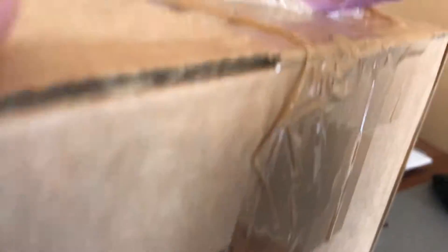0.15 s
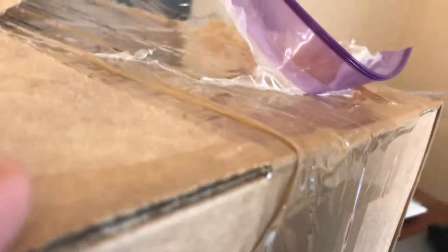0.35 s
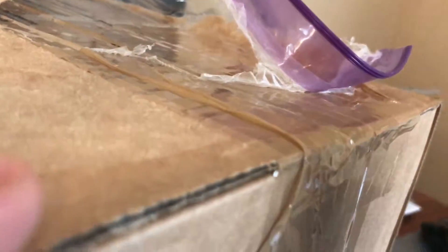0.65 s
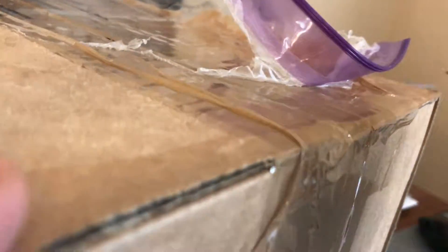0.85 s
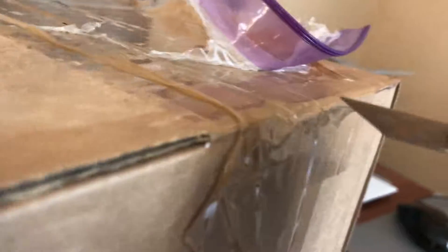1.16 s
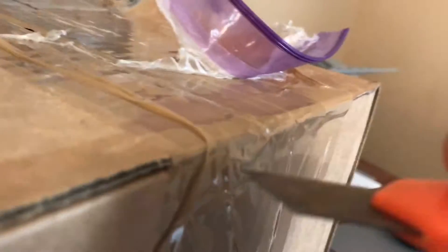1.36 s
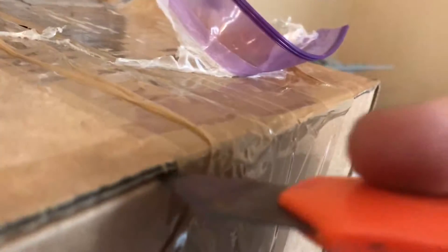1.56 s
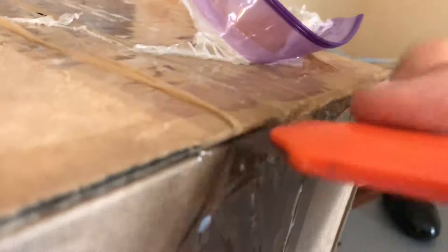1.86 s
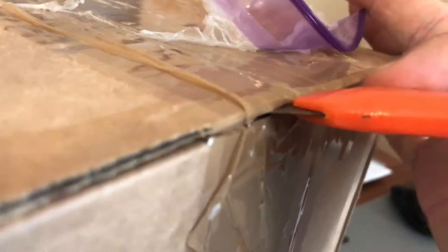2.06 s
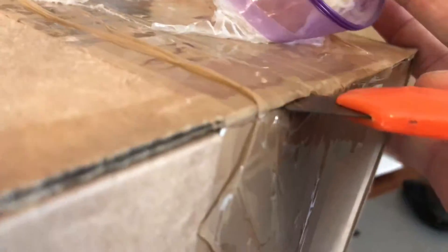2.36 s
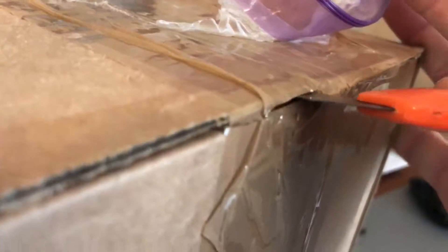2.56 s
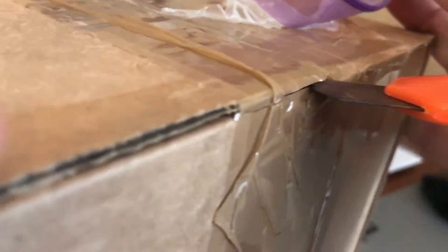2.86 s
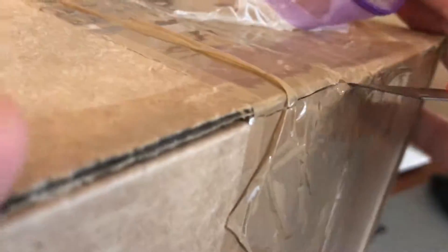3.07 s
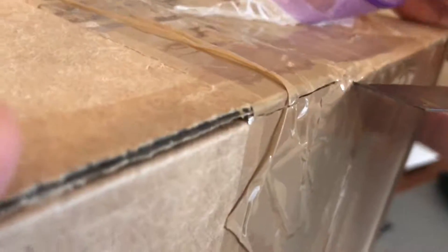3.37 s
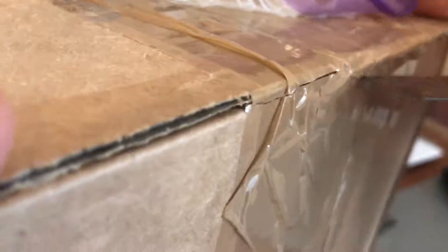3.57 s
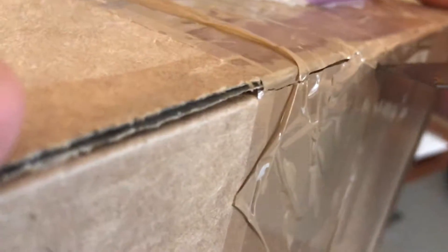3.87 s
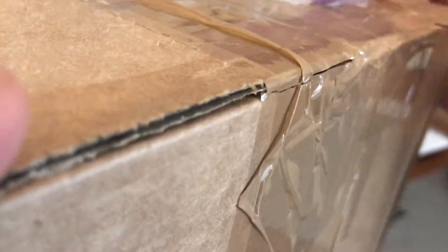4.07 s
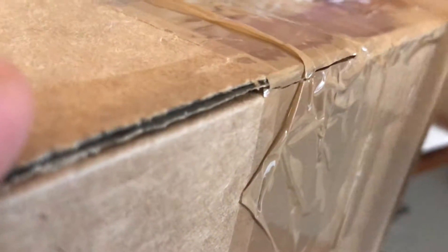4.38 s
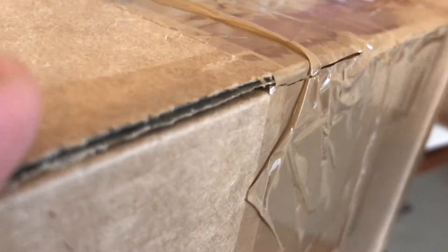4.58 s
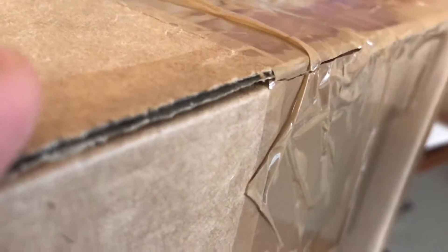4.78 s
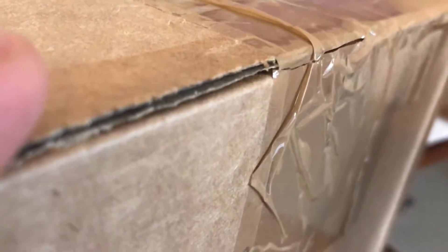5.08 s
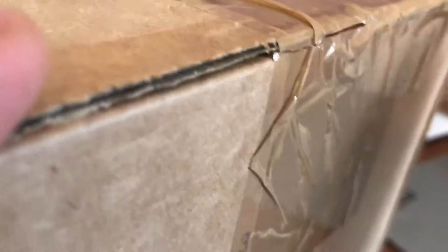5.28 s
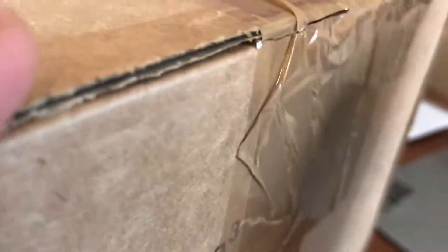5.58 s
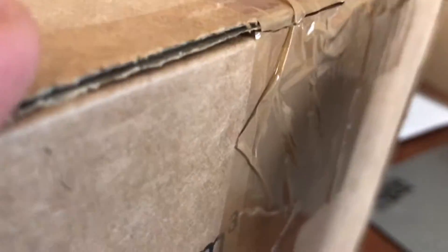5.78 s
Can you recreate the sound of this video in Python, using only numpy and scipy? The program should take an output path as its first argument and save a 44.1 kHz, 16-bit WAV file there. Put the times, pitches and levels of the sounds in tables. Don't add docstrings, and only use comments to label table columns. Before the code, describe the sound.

A taped cardboard box is handled softly, with light crinkles and a faint plastic ratchet. The blade enters with snaps and low knocks, rasps quietly, then breaks the film with a sharp pop and boom. Hard plastic clatter follows, then irregular crackling peels. Very near microphone, dry room, low hush and short dull tail.

```python
import sys
import numpy as np
from scipy import signal
from scipy.fft import rfft, irfft, next_fast_len
from scipy.io import wavfile
from scipy.ndimage import uniform_filter1d

SR = 44100
rng = np.random.default_rng(int(sys.argv[2]) if len(sys.argv) > 2 else 0)


def voltage_ratio(decibels):
    exponent = np.asarray(decibels, float) / 20
    return 10 ** exponent


def int16_out(signal):
    q = np.round(np.clip(np.atleast_2d(signal).T, -1, 1) * 32767)
    wavfile.write(sys.argv[1], SR, q.astype(np.int16))


N = 261513

# start in seconds, end in seconds, level in dB,
# tilt in dB per octave, place of the crest from 0 to 1.
TEAR_RUNS = [(0.219, 0.475, -55.5, -0.5, 0.45), (0.606, 0.73, -55, 2, 0.37),
             (1.192, 1.319, -55, -1.5, 0.24), (1.368, 1.449, -56.5, -0.5, 0.27),
             (1.635, 1.723, -50, -1.5, 0.33), (1.731, 1.786, -45, -1, 0.4), (1.773, 1.837, -45, -2.5, 0.42),
             (1.933, 1.967, -30, -2, 0.22), (1.964, 1.985, -32.5, -2.5, 0.63),
             (2.313, 2.378, -47.5, -1, 0.8), (3.65, 3.668, -25, -4, 0.56), (3.722, 3.767, -36.5, -1, 0.86),
             (3.957, 4.037, -66, -5.5, 0.9), (4.028, 4.089, -48.5, -2.5, .6), (4.407, 4.464, -66, 5, .3),
             (4.462, 4.497, -59, -3.5, 0.5), (5.033, 5.1, -45.5, -3.5, 0.64),
             (5.151, 5.211, -48, -2.5, 0.3), (5.447, 5.48, -35.5, -2, 0.83), (5.56, 5.6, -40, -1.5, 0.68),
             (5.684, 5.721, -32, -1.5, 0.1), (5.7, 5.77, -43.5, -3, 0.35)]
# start in seconds, end in seconds, level in dB,
# tilt in dB per octave, place of the crest from 0 to 1.
SLIDE_RUNS = [(0.064, 0.178, -67, -1.5, 0.8), (0.842, 0.973, -58, 1, 0.5), (1.074, 1.219, -63, 0.5, 0.75),
              (2.243, 2.337, -56, -2, 0.57), (2.374, 2.467, -59, -1, 0), (2.52, 2.603, -61, 0.5, 0.1),
              (2.58, 2.651, -54.5, -4, 0.42), (2.635, 2.691, -53, -3.5, 0.68),
              (2.711, 2.773, -56.5, -4, 0.8), (2.808, 2.953, -58.5, -1, 0.8),
              (2.964, 3.072, -50, -4.5, 0.57), (3.073, 3.19, -52, -4.5, 0.38),
              (3.155, 3.202, -53, -2, 0.27), (3.296, 3.341, -58.5, -1.5, 0.54),
              (3.428, 3.54, -60, -5, 0.84), (3.522, 3.61, -62, 1.5, 0.4), (3.767, 3.806, -57, 8, .3),
              (4.596, 4.847, -59, -0.5, 0.3), (4.924, 4.961, -58.5, 4.5, 0.5),
              (4.93, 4.989, -67, -4.5, 0.7), (5.251, 5.295, -58.5, 3, .3), (5.781, 5.82, -48.5, -1, 0.7)]
# frequency in Hz, width in Hz, level in dB.
BOX_MODES = [(53.2, 79, -7), (91.4, 20, 1), (127, 14.3, -1), (250, 29, -12), (294.5, 19.4, -8.5),
             (358.7, 4.5, -8)]
# frequency in Hz, width in Hz, level in dB.
CARD_MODES = [(564, 127, -1), (738.5, 55, -2.5), (874, 73, -5.5), (1106, 81, 0), (1166, 550, -14.5),
              (1564, 33, -2), (1643, 100, -12), (2640, 700, -21.5)]


def unit(x):
    return x / np.sqrt(np.mean(x ** 2))


def peak(x, db):
    return x * voltage_ratio(db) / np.abs(x).max()


def ring(x, modes):
    total = 0
    for k, (hz, width, db) in enumerate(modes):
        b, a = signal.iirpeak(hz, hz / width, fs=SR)
        total = total + (-1) ** k * voltage_ratio(db) * signal.lfilter(b, a, x)
    return total


def colour(x, points):
    hz, db = np.transpose(points)
    size = next_fast_len(len(x))
    log_hz = np.log(np.fft.rfftfreq(size, 1 / SR) + 1)
    gain = voltage_ratio(np.interp(log_hz, np.log(hz), db))
    return irfft(rfft(x, size) * gain, size)[:len(x)]


def band(x, lo_hz, hi_hz):
    return signal.sosfilt(signal.butter(2, [lo_hz, hi_hz], "band", fs=SR, output="sos"), x)


def walk(rate):
    hold = int(SR / rate)
    steps = np.repeat(rng.standard_normal(N // 20), hold)[:N]
    return uniform_filter1d(steps, hold)


def grit(spread_db, rate):
    return unit(rng.standard_normal(N) * voltage_ratio(spread_db * walk(rate)))


def burst(noise, decay_ms):
    decay_ms = max(decay_ms, .3)
    i = np.arange(len(noise))
    u = i / SR * 1000 / decay_ms
    click = 2.38 * np.sqrt(decay_ms) * (i == len(noise) // 200)
    return click + noise * (1 - np.exp(-u / 0.13)) * np.exp(-u)


def add(out, s, x):
    i = int(s * SR)
    out[i:i + len(x)] += x[:N - i]


def snaps():
    # time
    # in seconds, peak in dB, ring in Hz, top in dB, decay in ms.
    loose_film = [(0.5567, -40, 2020, -8, 7.2), (0.5704, -38.5, 3050, -4, 4.5),
                  (0.592, -38.5, 1790, -6, 8.6), (0.7567, -51.5, 1770, 11, 1.9),
                  (1.1443, -45, 5270, -15, 3.5), (1.6516, -24.5, 6700, -8, 3), (1.6585, -22, 1610, 3, 5.4),
                  (1.7184, -23, 5900, -17, 1.7), (1.7187, -21.5, 3540, -7, 0.81),
                  (1.7195, -19, 1600, -23, 1.6), (1.731, -35, 5780, 2, 2), (2.0612, -25.5, 1330, 7, 1.1),
                  (3.6029, -17.5, 4020, -4.5, 1.4), (3.6535, -27.5, 3300, -4.5, 1.5),
                  (3.6613, -6, 4170, -3, 1.4), (3.6635, -12.5, 2380, -0.5, 2.5),
                  (3.6755, -38.5, 4400, -6.5, 1.5), (3.7658, -29.5, 7250, 3, 2.5),
                  (3.8924, -22, 3900, -8.5, 1.3), (3.9337, -34, 6000, -7, 1.6),
                  (4.0434, -35.5, 2170, -27.5, 8), (4.0494, -27, 4040, -0.5, 2.6),
                  (4.0837, -23.5, 4270, -4.5, 2.8), (4.1121, -32.5, 4340, -9, 2.2),
                  (4.6976, -27, 2125, -28, 1.9), (4.9295, -46.5, 6000, 2.5, 6.1),
                  (5.0624, -30.5, 3810, -18, 4.7), (5.0757, -25, 3500, -15, 0.91),
                  (5.2623, -47.5, 6650, -40, 3.2), (5.8546, -18.5, 3150, -6, 1.1)]
    # time in seconds, peak in dB, ring in Hz, top in dB, decay in ms.
    cut_tape = [(1.178, -48, 1000, -8, 5.7), (1.2036, -37.5, 1570, 0, 5.6), (1.7808, -35, 1220, -20, 1.6),
                (1.8105, -31, 3450, -9, 1.9), (1.9355, -48, 1000, -14, 2.2), (1.979, -32.5, 1000, -14, 3),
                (2.0487, -22.5, 3540, 2.5, 1.96), (2.224, -41.5, 1250, 2, 5.3),
                (2.3557, -30.5, 1290, -5, 5), (2.5937, -53, 1200, 12.5, 3.5), (3.49, -40.5, 3680, -11, 1.3),
                (3.6127, -32, 1360, -5.5, 4.4), (3.7125, -25, 1100, -1, 2), (3.7341, -30, 1580, -8, 3),
                (3.7542, -35, 1680, -19.5, 3.5), (3.782, -42, 1630, -16, 3.5),
                (3.9423, -36, 1260, -24.5, 4.9), (4.0618, -29.5, 1290, -13, 7.2)]
    # time in seconds, peak in dB, ring in Hz, top in dB, decay in ms.
    peeled_tape = [(4.9955, -48, 3420, 1, 5.7), (5.008, -38.5, 1980, -2, 13), (5.1638, -33.5, 6340, 3, 7.7),
                   (5.391, -39.5, 1170, 5, 1.4), (5.4204, -34, 3500, -2, 1.6), (5.4285, -42, 3200, -7, 1.5),
                   (5.5495, -33.5, 3400, -19, 2.9), (5.6396, -31, 1240, 3, 6.3),
                   (5.6635, -28.5, 3150, -10, 7.2), (5.464, -25.5, 2930, -8, 2.2),
                   (5.4705, -26.5, 1300, -6, 4.5), (5.6865, -29.5, 2700, 7, 1.6),
                   (5.6885, -16, 1490, -2, 0.91), (5.6925, -19, 990, -5.5, 1.4), (5.7005, -28, 3980, -3, 2),
                   (5.7115, -33, 1200, -14, 3), (5.8395, -30.5, 1000, -8, 1.5),
                   (5.878, -22.5, 1280, 7.5, 2.7), (5.9129, -34.5, 3240, -16, 4.2),
                   (5.141, -39, 1500, -11, 1.8), (5.338, -53.5, 3300, -9, 1.5), (5.0925, -38, 1000, -16, 3),
                   (5.6425, -40, 5500, -6, 2.2), (5.867, -45, 7000, -3, 2), (5.892, -38, 5500, -6, 1.2),
                   (5.381, -48, 2000, -8, 5), (3.6625, -12.5, 6240, -10, 0.7), (3.868, -46, 3000, -8, 1.6)]
    kinds = [(loose_film, -20), (cut_tape, -6.5), (peeled_tape, -7.5)]
    rows = [(*row, card_db) for table, card_db in kinds for row in table]
    noises = rng.standard_normal((len(rows), 2400))
    overtones_hz = np.geomspace(1500, 8000, 7)
    out = np.zeros(N)
    for (s, db, hz, top_db, decay_ms, card_db), noise in zip(rows, noises):
        x = burst(noise, decay_ms)
        levels_db = -3 + 2.5 * noise[:7] - 3.15 * abs(np.log2(overtones_hz / hz))
        patch = [(f, 0.17 * f, level_db) for f, level_db in zip(overtones_hz, levels_db)]
        film = ring(x, patch) + voltage_ratio(-14) * band(x, 1000, 7430)
        film = film + ring(film, [(hz, 0.11 * hz, 5)])
        fizz = band(burst(noise, 0.52 * decay_ms), 5270, 16200)
        add(out, s, peak(film, db - 4.5))
        add(out, s, peak(fizz, db + top_db - 1.5))
        add(out, s, peak(ring(x, CARD_MODES[:5]), db + card_db - .5))
    return out


def rips():
    sag_db = 6
    out = np.zeros(N)
    cracks = grit(3.0, 500) * voltage_ratio(2.0 * walk(60))
    runs = TEAR_RUNS + SLIDE_RUNS
    blotches = rng.standard_normal((len(runs), 24))
    for (start, end, db, tilt_db, crest), blotch in zip(runs, blotches):
        x = cracks[int(start * SR):int(end * SR)]
        u = np.linspace(0, 1, len(x))
        swell = np.minimum(u / .12, (1 - u) / .25)
        edge = np.minimum(swell * min(voltage_ratio(db + 55), 1) ** .5, 1)
        edge = edge * voltage_ratio(-sag_db * abs(u - crest) / max(crest, 1 - crest))
        hz = np.geomspace(1000, 16000, len(blotch))
        film_db = tilt_db * np.log2(hz / 4000) + 2.2 * blotch
        film = colour(x, [(300, -30), *zip(hz, film_db)])
        card = voltage_ratio(2.0 - 4.23 * tilt_db) * ring(x, CARD_MODES)
        add(out, start, voltage_ratio(db) * edge * unit(film + card))
    return out


def shaking():
    tilt_weight = 1.74
    t, strength = np.arange(N) / SR, 0
    for start, end, db, tilt_db, crest in TEAR_RUNS + SLIDE_RUNS:
        top = start + np.clip(crest, .05, .95) * (end - start)
        shape = np.interp(t, [start, top, end, end + 0.041], [0.00013, 1.13, 0.47, 0])
        strength = strength + voltage_ratio(db - tilt_weight * tilt_db) * shape
    return strength


def rubbing():
    # time in seconds, sliding on film in dB, weight on the box in dB.
    hand_path = [(0.0, -75.5, -79), (0.3, -69.5, -64.5), (0.5, -67, -77), (0.76, -64, -81.5),
                 (1.2, -79.5, -68), (1.72, -72, -70), (1.88, -68, -62.5), (2.0, -57, -48.5),
                 (2.23, -60, -50.5), (2.41, -64, -56.5), (2.55, -69, -60.5), (2.9, -68, -64),
                 (3.3, -70, -62.5), (3.53, -70.5, -61), (3.83, -61.5, -49), (4.24, -64, -68),
                 (4.54, -57.5, -71), (4.79, -79, -101), (5.04, -68, -56.5), (5.2, -73, -59.5),
                 (5.33, -69.5, -63), (5.45, -63, -44.5), (5.61, -54, -52.5), (5.93, -55.5, -50.5)]
    # frequency in Hz, level in dB per Hz.
    film_spectrum = [(530, -21), (900, -0.5), (1260, -1), (1590, 0), (2730, -7), (3680, -3), (8050, -8),
                     (12900, -8), (16000, -6.5)]
    s, *columns = np.transpose(hand_path)
    slide_db, weight_db = (np.interp(np.arange(N) / SR, s, c) for c in columns)
    firm_db = weight_db + 55.5
    busy = shaking() * voltage_ratio(0.23 * firm_db)
    rasp = voltage_ratio(-66 + 0.88 * firm_db) + voltage_ratio(-14) * busy
    rumble = voltage_ratio(weight_db) + voltage_ratio(-7) * busy
    catch = voltage_ratio(2.0 * walk(35))

    stray = (rng.random(N) < 45 / SR) * voltage_ratio(4.0 * rng.exponential(size=N))
    fade = signal.lfilter([1], [1, -.97], stray)
    crinkle = band(fade * rng.standard_normal(N), 4000, 15000)
    skin = unit(colour(grit(3.1, 400), film_spectrum)) + voltage_ratio(-14.5) * crinkle
    card = unit(ring(grit(6.0, 150), CARD_MODES))
    box = unit(ring(band(grit(2.5, 40), 23, 430), BOX_MODES))
    return voltage_ratio(slide_db) * catch * skin + rasp * catch * card + rumble * box


def thumps():
    # time in seconds, peak in dB, boom in Hz, panels in dB.
    knocks = [(0.245, -41, 54.4, -23), (1.201, -30.5, 96, -35), (1.297, -46.5, 75, -15.5),
              (1.445, -46.5, 68.5, -26), (1.795, -34.5, 116, -20.5), (1.937, -54, 79, -10),
              (1.977, -28, 75, -11.5), (2.131, -35.5, 89, -20), (2.242, -39, 104, -32),
              (2.338, -32, 137, -12), (2.009, -29.5, 67.6, -33), (2.409, -46, 195, -10),
              (2.575, -48, 269, -8), (2.661, -41, 127, -8.5), (2.752, -36.5, 128.6, -13.5),
              (2.935, -44, 70, -16), (3.01, -49, 127, -3), (3.166, -35, 116.4, -8.5),
              (3.195, -33, 109.6, -28), (3.423, -45, 132, -16), (3.655, -20.5, 123.5, 2),
              (3.665, -18, 285.4, -9.5), (3.712, -33, 297, 5), (3.756, -28, 116.5, -3),
              (3.948, -40.5, 109, -16), (4.012, -37.5, 120, -12), (4.032, -35.5, 132.4, -14),
              (4.071, -38, 87, -12), (5.013, -36.5, 110, -28), (5.07, -34.5, 95, -12.5),
              (5.163, -41.5, 129, -11.5), (5.345, -44, 110, -9), (5.175, -31.5, 124.3, -19.5),
              (5.432, -37, 115, -22), (5.462, -35.5, 100, -3), (5.488, -49, 69.6, -20),
              (5.569, -40, 134, -26), (5.649, -34.5, 69.6, -5.5), (5.684, -22.5, 78.5, -15.5),
              (5.77, -37, 123, -24)]
    air_hz, air_width_hz = 127, 8.6
    out, t = np.zeros(N), np.arange(SR // 4) / SR
    push = np.sin(np.pi * np.minimum(t / 0.00312, 1))
    air = peak(ring(push, BOX_MODES[:3]), 0)
    panels = ring(push, BOX_MODES[3:] + CARD_MODES[:2])
    for s, db, hz, panel_db in knocks:
        t60_s = 0.16 * min(1, air_hz / hz) + 0.2 * np.exp(-((hz - air_hz) / air_width_hz) ** 2)
        decay = np.exp(-np.log(1000) * t / max(t60_s, .02))
        boom = np.sin(2 * np.pi * hz * t) * decay * np.minimum(t / 0.0037, 1)
        add(out, s, peak(boom + voltage_ratio(-4.0) * air, db - .5))
        add(out, s, peak(panels, db + panel_db + 2.5))
    return out


def clacks():
    # time in seconds, peak in dB, strongest ring in Hz, top in dB, decay in ms.
    hits = [(0.9173, -50, 3500, -18, 4.4), (0.9611, -51, 1720, -5, 7.1), (4.2882, -28, 3770, -52, 2.7),
            (4.3047, -28, 6050, -8, 6.7), (4.3474, -36.5, 2160, -16, 3.2), (4.366, -38.5, 1890, -9, 1.6),
            (4.3695, -33, 3400, -11.5, 2.2), (4.3722, -25, 2220, -9.5, 3.5),
            (4.3829, -29.5, 2070, -24.5, 5.7), (4.3945, -42, 4500, -7.5, 1.7),
            (4.3998, -14, 5200, -8.5, 2.1), (4.4012, -11, 4540, -5, .8), (4.4028, -9, 5650, -3.5, 0.73),
            (4.4068, -24.5, 2100, -18, 1.9), (4.4125, -33.5, 6900, -10, 2), (4.4202, -26, 2070, -23.5, 2.8),
            (4.4346, -27.5, 2150, -24, 2.2), (4.4695, -37, 1500, -20, 2.3), (4.4953, -29, 2600, -13, 2.6),
            (4.5554, -36, 3260, -19, 1.5), (4.6062, -35, 1870, -14, 15), (4.6372, -28.5, 3080, -4, 1.3),
            (4.6553, -29, 1800, -37, 6.6), (4.7039, -24.5, 4400, -10, 0.56), (4.7112, -29, 1910, 4, 6.1)]
    # frequency in Hz, width in Hz, level in dB.
    shell_modes = [(1200, 540, -1), (1600, 260, 3.5), (2150, 230, -0.5), (2700, 350, -7), (3240, 190, 3.5),
                   (3530, 300, 8), (4100, 620, -5.5), (4500, 71, -3.5), (5630, 360, -1.5), (6670, 1300, -3),
                   (6670, 190, -2), (7100, 490, -17)]
    out = np.zeros(N)
    noises = rng.standard_normal((len(hits), 2400))
    for (s, db, hz, top_db, decay_ms), noise in zip(hits, noises):
        grip = noise[-2 * len(shell_modes):].reshape(-1, 2) * [.03, 2]
        near = []
        for (f, width, level_db), (shift, change_db) in zip(shell_modes, grip):
            distance = abs(np.log2(f / hz))
            near.append((f * (1 + shift), width, level_db + change_db - 3.4 * distance))
        x = band(burst(noise, decay_ms), 630, 17000)
        shell = ring(x, near) + voltage_ratio(-7) * band(x, 1100, 8500)
        add(out, s, peak(shell + ring(shell, [(hz, 500, 6)]), db - .5))
        add(out, s, peak(band(x, 6100, 13000), db + top_db - .5))
    return out


def crinkles():
    # time in seconds, peak in dB, ring in Hz.
    folds = [(0.5107, -71, 6100), (0.856, -47, 11100), (0.885, -38.5, 7900), (0.9623, -37.5, 8800),
             (0.9994, -59, 5890), (1.115, -38, 10800), (1.1807, -51.5, 6010), (1.451, -53, 6620),
             (1.479, -56, 8500), (1.547, -50.5, 8950), (1.5693, -57, 9550), (2.6374, -45, 8800),
             (2.7177, -48, 13100), (2.801, -47, 11400), (3.3368, -45, 7400), (3.3797, -56, 10700),
             (3.5882, -47, 10000), (3.8838, -48, 7300), (5.3406, -51, 5840)]
    out = np.zeros(N)
    for (s, db, hz), noise in zip(folds, rng.standard_normal((len(folds), 600))):
        x = band(burst(noise, 1.0), 0.85 * hz, 1.4 * hz)
        add(out, s, peak(band(x, 0.44 * hz, 1.3 * hz), db - .5))
    return out


def squeaks():
    # start in seconds, end in seconds, level in dB, frequency in Hz, width in Hz.
    squeak_rows = [(0.08, 0.18, -73.5, 4330, 170), (0.689, 0.71, -63.5, 710, 45),
                   (0.852, 0.89, -66, 3440, 140), (0.915, 0.928, -53.5, 3500, 110),
                   (0.927, 0.939, -56, 3800, 140), (0.94, 0.947, -67, 4200, 140),
                   (0.961, 0.965, -49, 3500, 180), (0.97, 0.981, -60, 3500, 180),
                   (0.984, 0.987, -62, 3450, 200), (0.906, 0.943, -65.5, 1770, 120),
                   (0.958, 0.973, -50.5, 1670, 200), (0.972, 0.995, -64, 1850, 120),
                   (1.29, 1.378, -75, 1170, 25), (1.38, 1.6, -71, 1130, 22), (1.497, 1.582, -82, 3000, 54),
                   (1.367, 1.426, -72, 2900, 90), (1.782, 1.84, -54.5, 3550, 160),
                   (2.997, 3.054, -65, 6800, 230), (3.09, 3.15, -75, 6800, 250),
                   (4.118, 4.133, -57, 4200, 170), (3.43, 3.48, -60, 800, 120),
                   (2.86, 2.93, -61, 3130, 500), (2.87, 2.92, -62, 2160, 270), (2.35, 2.39, -52, 454, 95),
                   (1.17, 1.21, -61, 493, 89), (4.46, 4.52, -64.5, 660, 200), (4.05, 4.11, -53, 1900, 300),
                   (5.69, 5.7, -34, 1550, 130), (5.448, 5.475, -35.5, 693, 68),
                   (5.459, 5.483, -38.5, 920, 190), (2.99, 3.156, -71, 4460, 170),
                   (3.725, 3.769, -48, 1630, 87)]
    out = np.zeros(N)
    slips = grit(2, 80)
    lead = 2000
    for start, end, db, hz, width in squeak_rows:
        x = slips[int(start * SR) - lead:int(end * SR)]
        x = band(x, 0.54 * hz, 1.33 * hz)
        x = ring(x, [(hz, max(width, 8), 0)])[lead:]
        add(out, start, voltage_ratio(db) * np.hanning(len(x)) ** 0.19 * unit(x))
    return out


def room_tail(near):
    t60_s, level_db = 0.26, -19.5
    t = np.arange(SR // 3) / SR
    decay = np.exp(-np.log(1000) * t / t60_s) * (t > .003)
    tail = band(rng.standard_normal(len(t)), 300, 12000) * decay
    return voltage_ratio(level_db) * signal.fftconvolve(near, tail / np.sqrt(np.sum(tail ** 2)))[:N]


def room_tone():
    # frequency in Hz, level in dB per Hz.
    hush_spectrum = [(15, -30), (25, 23), (55, -4), (223, 5.5), (463, -8), (591, -10), (1740, -20.5),
                     (2610, -21), (12500, -36.5), (16000, -46.5)]
    return voltage_ratio(-64 + 1.0 * walk(6.2)) * unit(colour(rng.standard_normal(N), hush_spectrum))


def scene():
    near = snaps() + rips() + rubbing() + clacks() + crinkles() + squeaks()
    mix = near + room_tail(near) + thumps()
    b, a = signal.iirnotch(165, 3.5, fs=SR)
    return (signal.lfilter(b, a, mix) + room_tone())[None]


def roll_off(x):
    return signal.sosfilt(signal.butter(12, 16980, fs=SR, output="sos"), x)


def record(dry):
    x = signal.sosfilt(signal.butter(3, 45, "high", fs=SR, output="sos"), dry)
    x = signal.sosfilt(signal.ellip(6, .2, 22, 15800, fs=SR, output="sos"), x)
    return roll_off(x)


dry = scene()
out = record(dry)
int16_out(out)
```